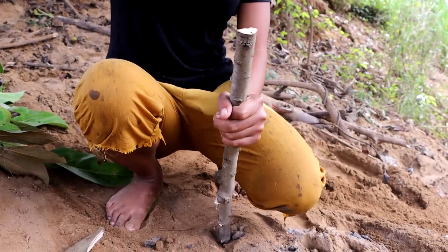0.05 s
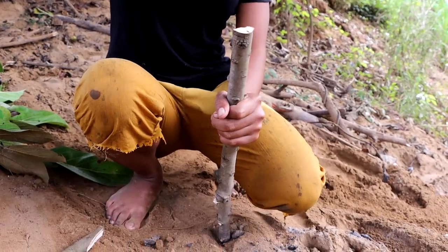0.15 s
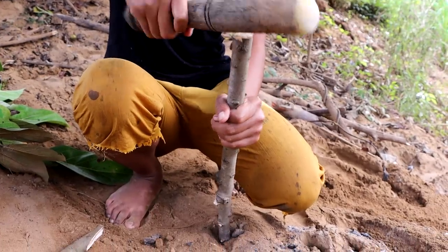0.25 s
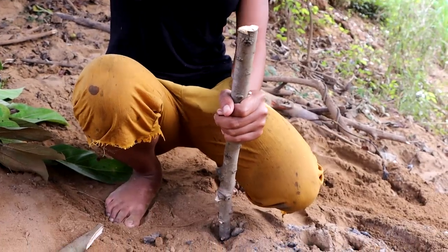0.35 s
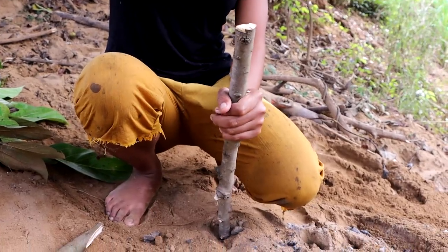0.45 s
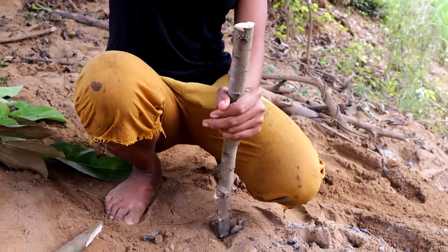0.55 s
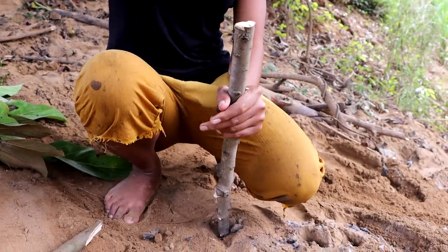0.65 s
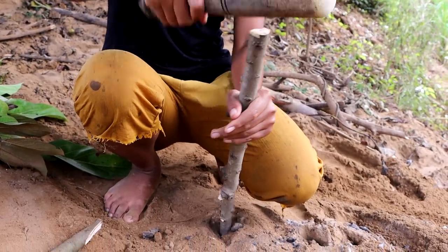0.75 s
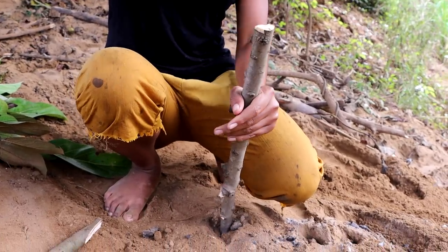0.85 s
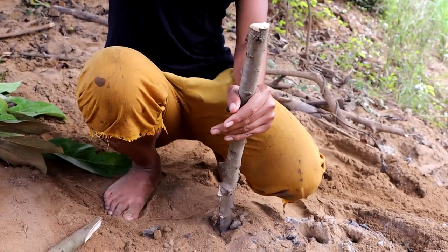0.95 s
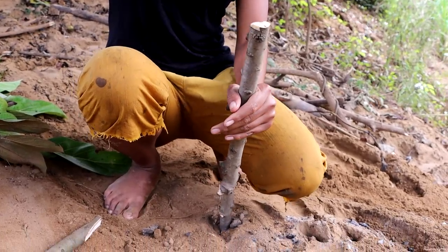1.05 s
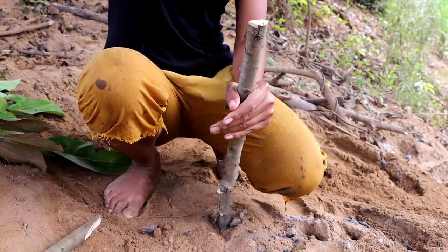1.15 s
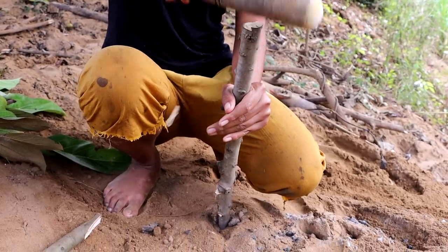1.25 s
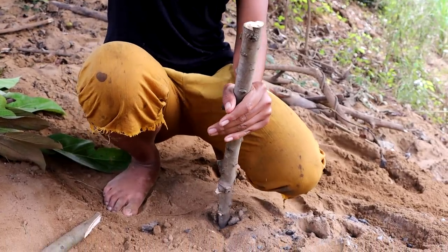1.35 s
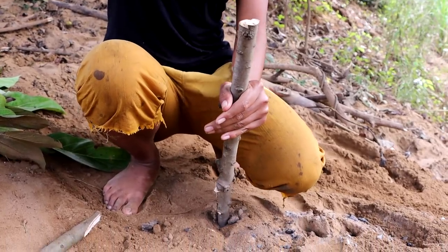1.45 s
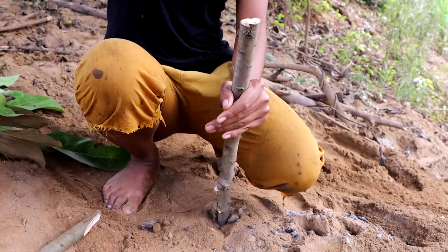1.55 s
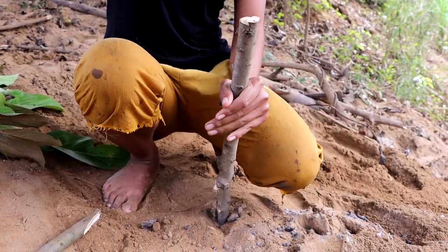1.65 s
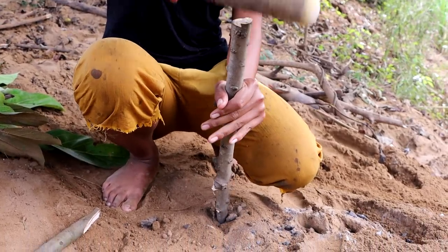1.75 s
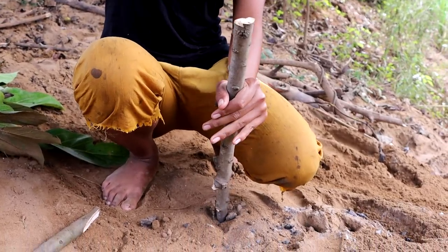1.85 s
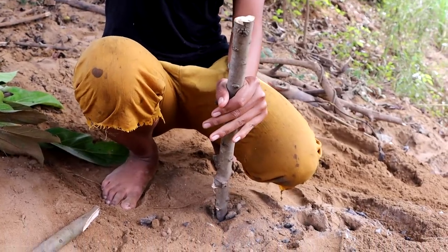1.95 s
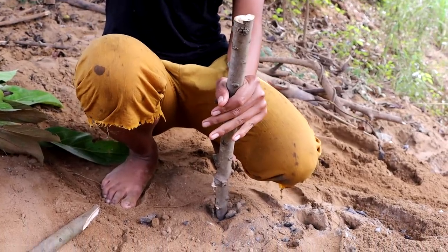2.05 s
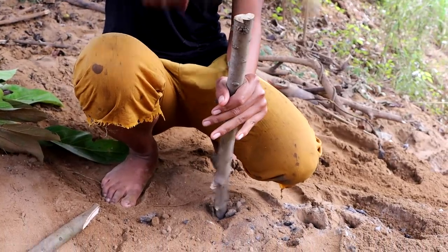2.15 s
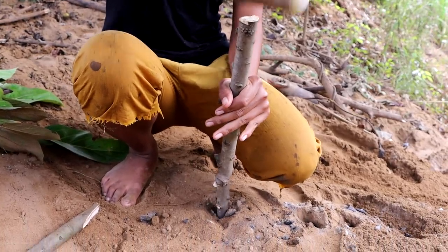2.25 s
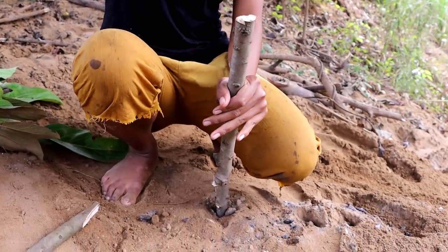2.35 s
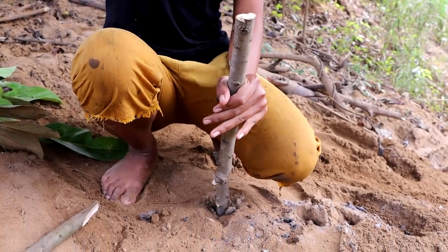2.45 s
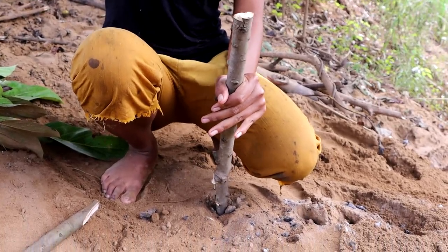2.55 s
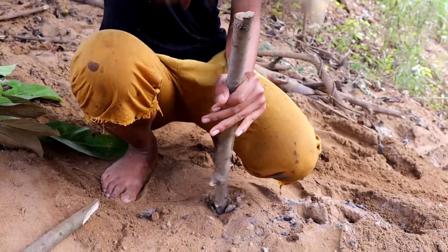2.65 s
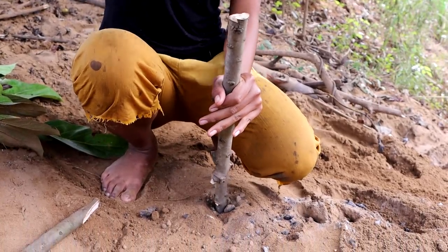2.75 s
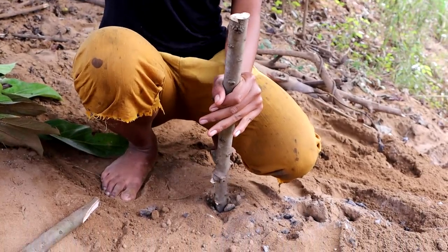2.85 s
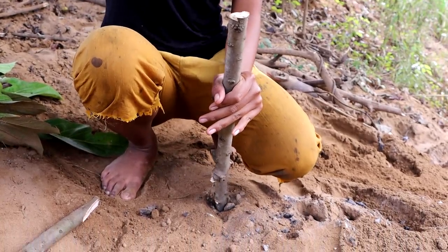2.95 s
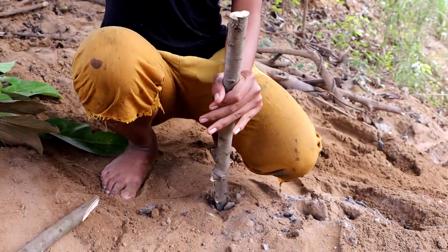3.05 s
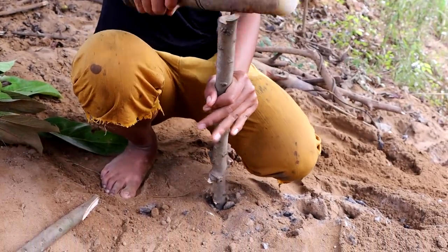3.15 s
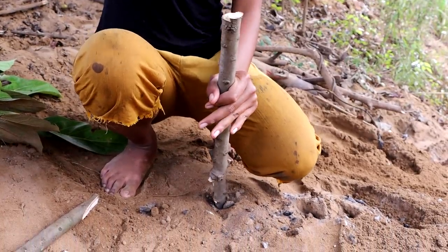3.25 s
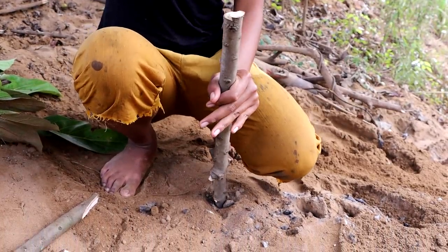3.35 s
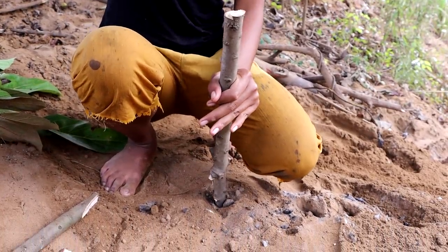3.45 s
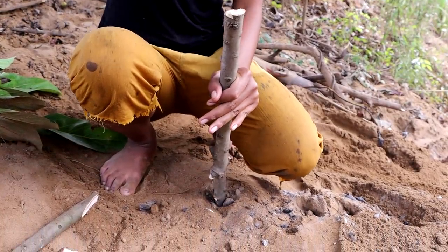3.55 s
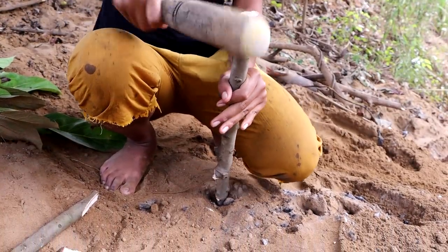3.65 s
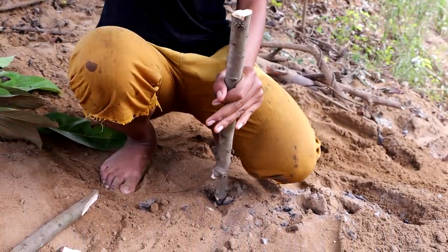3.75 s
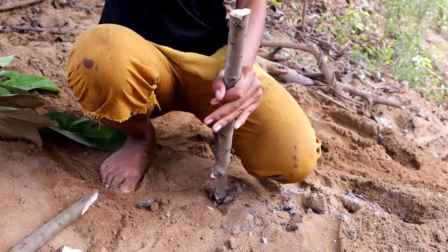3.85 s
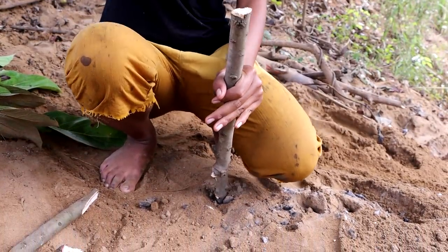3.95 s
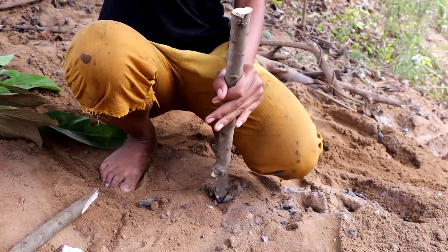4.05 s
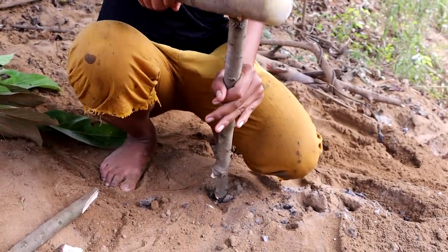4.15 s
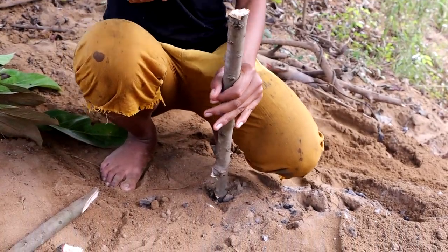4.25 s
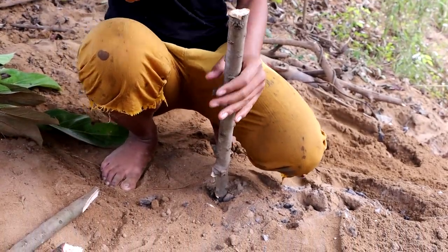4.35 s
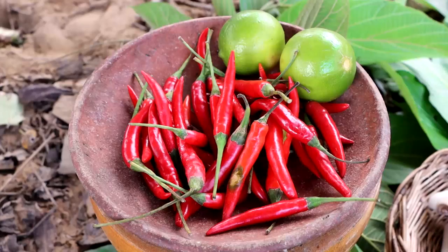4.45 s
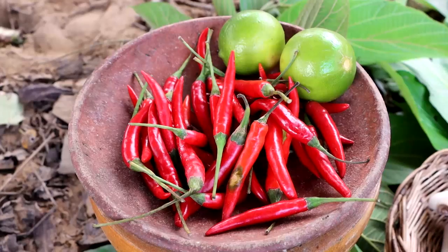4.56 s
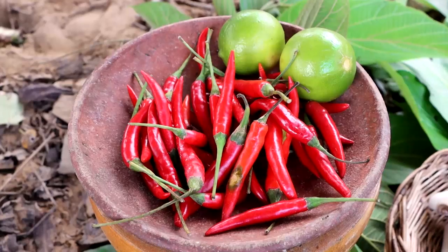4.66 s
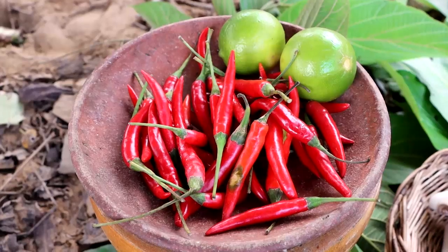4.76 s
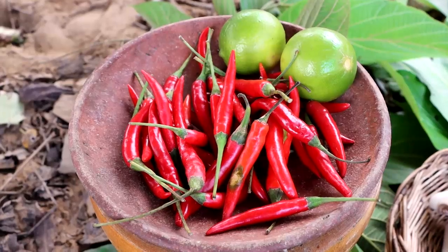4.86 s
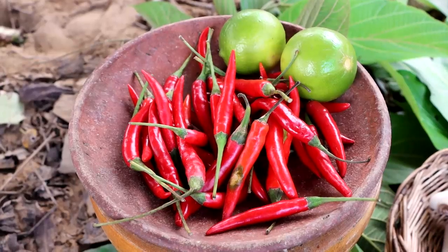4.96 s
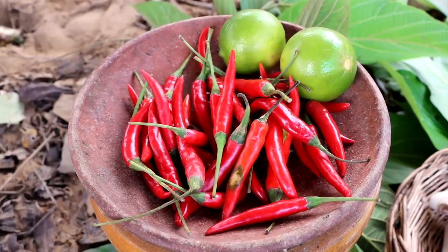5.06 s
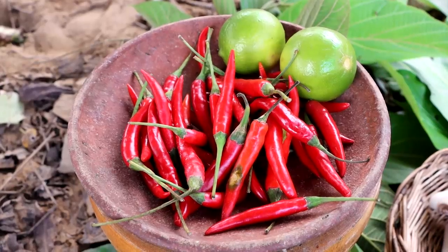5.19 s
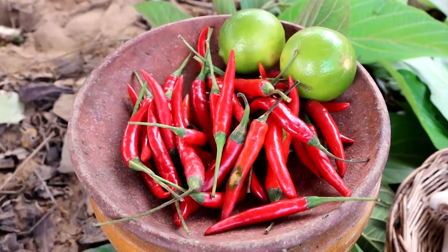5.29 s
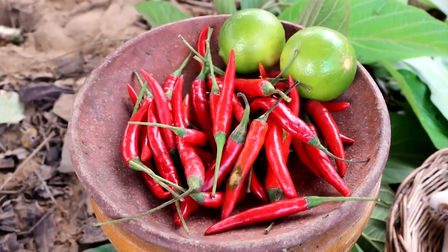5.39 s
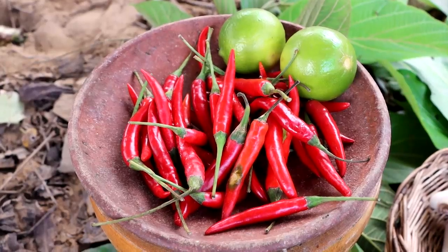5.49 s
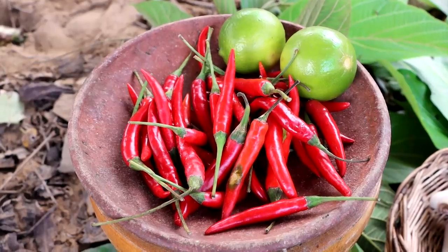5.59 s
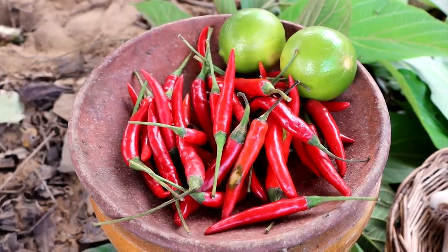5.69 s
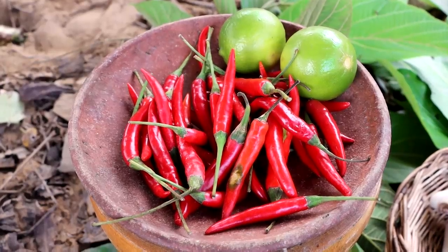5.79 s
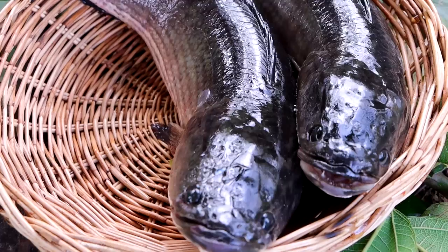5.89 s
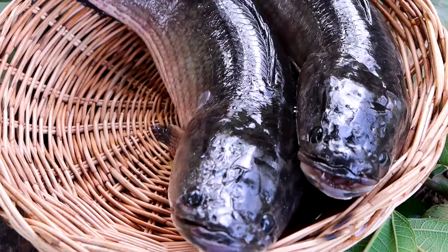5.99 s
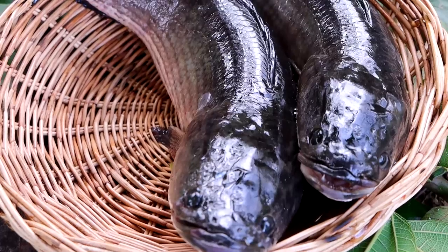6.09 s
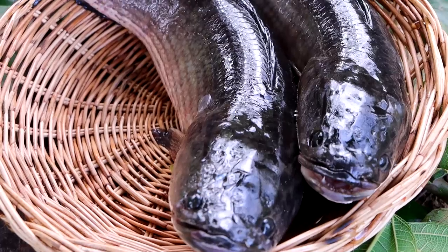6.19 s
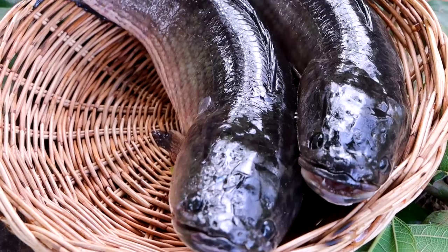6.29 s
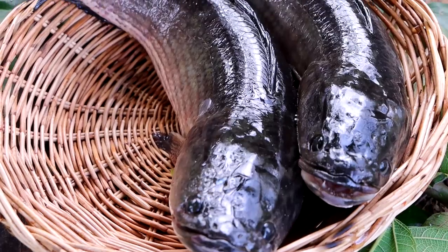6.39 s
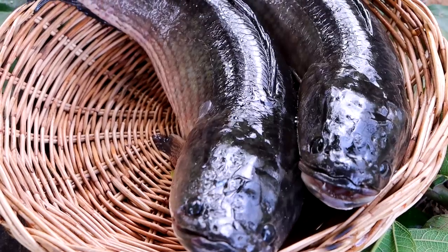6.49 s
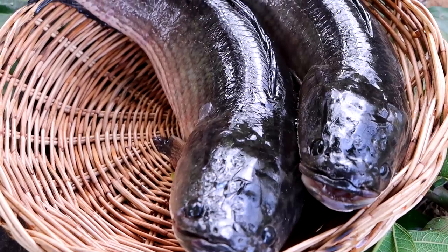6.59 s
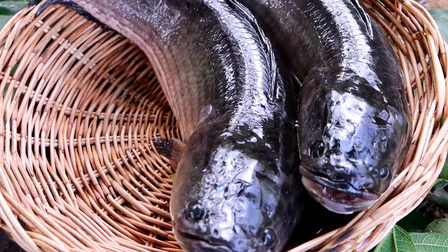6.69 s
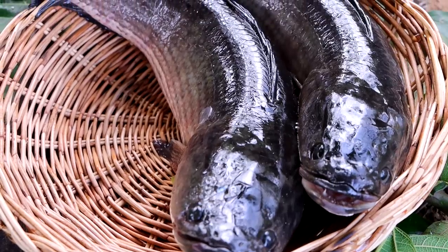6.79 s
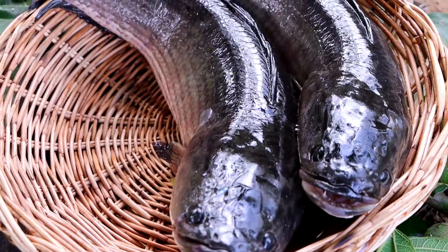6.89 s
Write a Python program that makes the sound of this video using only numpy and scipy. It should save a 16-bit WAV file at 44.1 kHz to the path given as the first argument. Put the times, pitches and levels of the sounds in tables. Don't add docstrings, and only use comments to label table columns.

```python
import sys
import numpy as np
from scipy import signal
from scipy.io import wavfile

SR = 44100
rng = np.random.default_rng(int(sys.argv[2]) if len(sys.argv) > 2 else 0)


def master(y):
    cut = np.clip(np.atleast_2d(y).T, -1, 1)
    pcm = np.round(cut * 32767)
    wavfile.write(sys.argv[1], SR, pcm.astype(np.int16))


def linear_from_db(decibels):
    return 10 ** (np.asarray(decibels, float) / 20)


N = 305613

# [start t/s, end t/s]
VIEWS = [
    (0, 4.442),
    (4.442, 5.823),
    (5.869, 7),
]
# [f/Hz, likeness from -1 to 1]
LIKENESS = [(60, 0.94), (130, 0.64), (290, 1), (640, 0.45), (1410, 0.01), (3100, -0.06), (6820, -0.52),
            (15000, 1)]

# [f/Hz, level per Hz/dB]
AIR = [
    [(15, -33), (25, -6), (107, -3), (322, -4), (421, -7), (895, -3.5), (1710, -2.5), (5140, -14),
     (6550, -3), (8130, -22), (12500, -19.5), (15500, -49)],
    [(15, -37), (25, -8.5), (84, -9.5), (253, -13), (804, -15), (919, -14), (1140, -11), (5430, -21.5),
     (6380, -14), (6920, -27), (12800, -31), (15500, -44.5)],
    [(15, -36), (25, 1), (126, -1.5), (582, -5.5), (666, -5), (1140, -1), (2170, -1), (5730, -14),
     (6380, -3), (6920, -12), (11800, -19), (15500, -46.5)],
]
AIR_LEVELS = [-65, -60, -59.5]
# [low f/Hz, high f/Hz, level/dB]
CICADAS = [(6280, 6850, -72), (6200, 6600, -71.5), (6220, 6600, -69)]
# [f/Hz, first t/s, last t/s, period/s, level/dB]
CRICKETS = [(7145, .06, 2.6, .226, -78), (7145, 2.82, 4.42, .2255, -77), (7310, 1.47, 4.3, .253, -80)]
# [start t/s, length/s, first f/Hz, glide/(Hz/s), level/dB]
BIRD_NOTES = [(0.0, 0.13, 4150, -6, -78.5), (.09, 0.041, 4720, 607, -69), (0.131, 0.068, 4290, -7000, -66),
              (.19, 0.078, 3650, 10, -80), (.31, .13, 3930, -0.5, -75.5), (0.444, 0.1, 3970, 1205, -70),
              (.48, 0.053, 4400, -3000, -68), (0.628, 0.085, 4310, -2000, -67.5),
              (0.861, 0.13, 4290, -1200, -72), (1.04, 0.079, 3990, -800, -72),
              (1.122, 0.052, 3750, 1200, -70), (1.295, 0.14, 4100, -1300, -75.5),
              (4.209, 0.086, 5250, -13000, -68), (4.277, .05, 4400, 0.5, -77),
              (4.365, .08, 4700, -2000, -67.5), (5.083, .05, 4500, -5000, -79.5),
              (5.37, 0.091, 4400, -400, -70.5), (5.663, 0.067, 4100, -0.5, -72)]
# [f/Hz, level/dB, time to fall 60 dB/s]
TRUNK_ECHOES = [(100, -43.5, .12), (295, -37.5, 0.1), (930, -46, 0.13), (2980, -36.5, 0.039),
                (6998, -37, 0.046), (13000, -44, 0.1)]
# [peak t/s, level/dB]
GUSTS = [(4.913, -51.5), (5.055, -61), (5.17, -69), (5.298, -63), (5.545, -58.5), (5.6, -65),
         (5.685, -51.5), (5.815, -54)]

# [start t/s, hold/s, level/dB, thin top above that/dB]
LEAF_STIRS = [(4.538, 0.0067, -57, -25), (4.617, 0.0095, -56, -11), (4.645, 0.12, -55, -8),
              (4.81, 0.056, -58, -9), (4.905, 0.0056, -59.5, -4), (5.17, 0.043, -74, -2),
              (5.38, 0.021, -84, 11), (5.584, .05, -94, 2)]
# [f/Hz, level per Hz/dB]
LEAF_COLOUR = [(240, -32), (400, 4), (442, -16), (660, 2.5), (768, -25), (1440, -3.5), (4670, 1.5),
               (8000, -13.5), (10400, -49), (17600, -120)]
# [t/s, peak level/dB, f/Hz, time to fall 60 dB/s]
SMALL_KNOCKS = [(3.759, -42.5, 7960, 0.055), (4.535, -34.5, 2570, 0.04), (4.569, -43, 4740, 0.045),
                (4.612, -57, 5150, 0.026), (4.635, -31, 560, 0.046), (4.735, -36, 4670, 0.076),
                (4.808, -31.5, 470, 0.12), (4.8942, -21.5, 970, 0.032), (4.897, -33, 694, 0.14),
                (6.41, -45, 406, 0.046)]

# [t/s, club level/dB, upper club level/dB, bright ring level/dB, crack level/dB]
BLOWS = [(0.2836, -6.5, -22, -29, -24), (0.7535, -4.5, -3, -26, -15), (1.2308, -5.5, -17.5, -19, -22.5),
         (1.7156, -3, -15, -19.5, -21), (2.2097, -4, -15, -15.5, -17.5), (2.7081, -2, -11.5, -22, -20),
         (3.1747, -6, -10, -16.5, -22), (3.6548, -13, -25, -33, -25.5), (4.1505, -6, -25.5, -22, -19)]
# [t/s, club, upper club, bright ring, crack level/dB]
LAST_BLOWS = [(6.232, -14, -18, -31.5, -27), (6.746, -11, -22, -23, -28.5)]
# [f/Hz, level/dB, time to fall 60 dB/s]
WOOD = [
    [(1112.5, 3.5, 0.034), (1375, -15, 0.014)],
    [(1230, 10, 0.026), (1778, -5, 0.024)],
    [(333.6, -4, 0.05), (497, 7.5, 0.022), (766, 15, .012)],
    [(2660, 13, 0.013), (2780, 1, 0.009), (2925, 9, 0.015)],
    [(1655, 4.5, .022), (2240, 0.5, 0.025), (3272, 3.5, .01), (3690, 0, 0.0083), (4940, -3, 0.012)],
]
# [f/Hz, level/dB, time to fall 60 dB/s]
LAST_WOOD = [
    [(845, 10.5, 0.013), (974, -5.5, 0.042)],
    [(1292, 4.3, 0.036), (1527, 5.5, 0.013)],
    [(289, 3, 0.021), (424, 10, 0.014), (595, 13.8, 0.011)],
    [(2730, 14.4, 0.012), (3050, 5, 0.03)],
    [(1725, 8.5, 0.017), (3170, -4.5, 0.013), (4010, -3.5, 0.015)],
]
GROUP_SIGNS = (1, 1, -1, 1, 1)
# [f/Hz, level/dB, time to fall 60 dB/s, rise/s]
SOIL = [(195.5, 15.5, 0.04, 0.0026), (153, 13.5, 0.045, 0.002), (118, 4, 0.069, .008), (88, 4, 0.078, .012)]
# [f/Hz, level per Hz/dB]
GRIT = [(150, -13.5), (500, -6.5), (1250, 3.5), (2000, -2), (2800, -3), (4500, -14), (8000, -20),
        (13000, -29.5)]
# [low f/Hz, high f/Hz, level/dB, time to fall 60 dB/s]
GLOW = [
    (110, 350, -16, 0.25),
    (1170, 1750, -27, 0.19),
    (2670, 2920, -22.5, 0.25),
]
# [low f/Hz, high f/Hz, level/dB, time to fall 60 dB/s]
LAST_GLOW = [
    (110, 230, 0, 0.13),
    (1106, 1440, -9.5, 0.14),
    (2900, 3300, -28, 0.17),
]
OVERLOAD = [.635, .9]


def unit(x):
    return x / np.sqrt(np.mean(x ** 2) + 1e-20)


def at_hz(points, hz, column=1):
    points = np.array(points)
    return np.interp(np.log(hz), np.log(points[:, 0]), points[:, column])


def band(x, low_hz, high_hz, order=2):
    edges = [low_hz, min(high_hz, 20000)]
    return signal.sosfilt(signal.butter(order, edges, "band", fs=SR, output="sos"), x)


def no_bass(x, order):
    return signal.sosfilt(signal.butter(order, 55, "high", fs=SR, output="sos"), x)


def drift(rate, size):
    r = np.exp(-80 * np.pi * rate / SR)
    slow = signal.lfilter([1], [1, -2 * r, r * r], rng.standard_normal(size // 40 + 2002))[2000:]
    return np.interp(np.arange(size) / 40, np.arange(len(slow)), unit(slow))


def add(out, sound, s):
    i = max(round(s * SR), 0)
    out[:, i:i + sound.shape[-1]] += sound[..., :N - i]


def coloured(spectrum, size, patchy_db):
    out = 0
    edges = 35 * 2 ** np.arange(0, 9.1, .5)
    white = rng.standard_normal((2, 2, size + 4000))
    for k, (low, high) in enumerate(zip(edges, edges[1:])):
        hz = np.sqrt(low * high)
        mid, side = band(white[k % 2], low, high)[:, 4000:]
        alike = np.clip(at_hz(LIKENESS, hz), -1, 1)
        gain = linear_from_db(at_hz(spectrum, hz) + patchy_db * drift(20, size))
        out = out + gain * (np.sqrt(1 + alike) * mid + np.sqrt(1 - alike) * side * [[1], [-1]])
    return unit(out)


def air_and_cicadas():
    out = np.zeros((2, N))
    for (start, end), air, air_db, (low_hz, high_hz, db) in zip(VIEWS, AIR, AIR_LEVELS, CICADAS):
        size = round((end - start) * SR)
        hiss = unit(band(rng.standard_normal((2, size)), low_hz, high_hz, order=3))
        cicadas = linear_from_db(db + drift(8, size)) * hiss
        add(out, linear_from_db(air_db) * coloured(air, size, patchy_db=1.9) + cicadas, start)
    return out


def crickets():
    chirp_s, pair_s, ear_lag_rad, wing_hz = .04, .056, 1.4, 170
    out, t = np.zeros((2, N)), np.arange(round(chirp_s * SR)) / SR
    swell = np.sin(np.pi * t / t[-1])
    for hz, first, last, period, db in CRICKETS:
        for s in np.arange(first, last, period):
            for later in (0, pair_s):
                phase = rng.uniform(0, 2 * np.pi) + np.array([[0], [ear_lag_rad]])
                vary_db = rng.standard_normal((2, 1))
                buzz = 1 + .2 * np.sin(2 * np.pi * wing_hz * t + phase)
                chirp = swell * buzz * np.sin(2 * np.pi * hz * t + phase)
                add(out, linear_from_db(db + 8 + vary_db) * chirp, s + later - chirp_s / 2)
    return out


def bird():
    edge_s, echo_t60_s, warble_hz, warble_depth = .02, .14, 65, .8
    song = np.zeros((1, N))
    for s, length, hz, glide, db in BIRD_NOTES:
        t = np.arange(round(length * SR)) / SR
        edges = np.clip(np.minimum(t, length - t) / edge_s, 0, 1)
        add(song, linear_from_db(db + 3.5) * edges * np.sin(2 * np.pi * (hz + glide * t / 2) * t), s)
    t = np.arange(round(.12 * SR)) / SR
    echoes = rng.standard_normal((2, len(t))) * linear_from_db(-60 * t / echo_t60_s)
    echoes = echoes / np.linalg.norm(echoes[0])
    warble = 1 + warble_depth * np.sin(2 * np.pi * warble_hz * np.arange(N) / SR)
    return signal.fftconvolve(song * warble, echoes, axes=1)[:, :N]


def forest_echo(dry):
    far_db, far_t60_s = -24.5, 0.61
    t, tail = np.arange(round(.6 * SR)) / SR, 0
    edges = 60 * 2 ** np.arange(0, 8.1, 1)
    white = rng.standard_normal((3, len(t)))
    for low, high in zip(edges, edges[1:]):
        hz = np.sqrt(low * high)
        alike = np.clip(at_hz(LIKENESS, hz), 0, 1)
        noise = band(np.sqrt(alike) * white[0] + np.sqrt(1 - alike) * white[1:], low, high)
        near = linear_from_db(-60 * t / at_hz(TRUNK_ECHOES, hz, column=2))
        far = linear_from_db(far_db - 60 * t / far_t60_s)
        tail = tail + linear_from_db(at_hz(TRUNK_ECHOES, hz)) * (near + far) * noise
    tail = tail * np.clip((t - .004) / .008, 0, 1)
    return signal.fftconvolve(dry.mean(axis=0)[None], tail, axes=1)[:, :N]


def wind():
    rise_db_per_s, fall_db_per_s, calm_db = 700, 404, -78
    start, end = VIEWS[1]
    t = np.arange(N) / SR
    s, peak_db = np.transpose(GUSTS)[..., None]
    gusts_db = peak_db - np.maximum(rise_db_per_s * (s - t), fall_db_per_s * (t - s))
    floor_db = np.where((t > start) & (t < end), calm_db, -150)
    db = np.maximum(gusts_db.max(axis=0), floor_db)
    lumps = band(rng.standard_normal((2, N)), 49, 190)
    return linear_from_db(db + np.array([[5], [-8]])) * unit(lumps)


def rustle():
    attack_s, release_db_per_s, body_rest_db, top_rest_db = 0.014, 500, -74, -78
    crackle_per_s, crackle_db = 350, -5.5
    out, (view_start, view_end) = np.zeros((2, N)), VIEWS[1]
    size = round(view_end * SR) - round(view_start * SR)
    t = view_start + np.arange(size) / SR
    s, hold, db, top_db = np.transpose(LEAF_STIRS)[..., None]
    swell = np.clip((t - s) / attack_s + 1, 0, 1)
    stir = swell * linear_from_db(db - release_db_per_s * np.maximum(t - s - hold, 0))
    body = linear_from_db(body_rest_db) + stir.sum(axis=0)
    thin = linear_from_db(top_rest_db) + (stir * linear_from_db(top_db)).sum(axis=0)

    clumps = linear_from_db(2.8 * drift(33, size) + 2.4 * drift(250, size))
    top = unit(band(rng.standard_normal((2, size)), 6800, 13500))
    hiss = linear_from_db(2.5) * body * coloured(LEAF_COLOUR, size, patchy_db=1.5)

    snap_sizes = linear_from_db(4 * np.minimum(rng.exponential(1, size), 4))
    snaps = (rng.random(size) < crackle_per_s / SR) * snap_sizes
    burst = rng.standard_normal((2, 130)) * linear_from_db(-np.arange(130) / 2.8)
    crackle = signal.fftconvolve(snaps[None], burst, axes=1)[:, :size]
    crackle = unit(band(crackle, 2000, 9000))
    add(out, linear_from_db(crackle_db) * body * crackle, view_start)
    add(out, clumps * (hiss + thin * top), view_start)
    return out


def small_knocks():
    out, t = np.zeros((2, N)), np.arange(round(.15 * SR)) / SR
    for s, db, hz, t60 in SMALL_KNOCKS:
        noise = rng.standard_normal((3, len(t)))
        noise = (noise[0] + 0.033 * noise[1:]) * linear_from_db(-60 * t / max(t60, .005))
        body = unit(band(noise, .5 * hz, 2.1 * hz))
        body = body + 0.21 * unit(band(noise, hz, hz + 5000, order=1))
        core = np.sin(2 * np.pi * hz * t) * linear_from_db(-60 * t * hz / 9.3)
        add(out, linear_from_db(db) * (.5 * body / np.abs(body).max() + 0.72 * core), s)
    return out


def rings(modes, t):
    pitch_spread, ear_db, ear_rad = .012, 1.04, 0.044
    out, ear = 0, np.array([[1], [-1]])
    late = t - ear * .5 / SR
    for hz, db, t60 in modes:
        lean = rng.standard_normal(2) * hz / 1000
        hz = hz * (1 + pitch_spread * rng.standard_normal())
        level = linear_from_db(db - 60 * t / t60 + ear_db * lean[1] * ear)
        out = out + level * np.sin(2 * np.pi * hz * late + ear_rad * lean[0] * ear)
    return out


def struck_wood(groups, levels_db, t, build_s):
    parting_at_s, parting_s = .0062, .0011
    parted = 1 / (1 + np.exp(-(t - parting_at_s) / parting_s))
    wood = 0
    for way, db, modes in zip(GROUP_SIGNS, levels_db, groups):
        wood = wood + way * linear_from_db(db) * rings(modes, t)
    return wood * (1 - np.exp(-t / build_s)) * linear_from_db(-8 * parted)


def cracking_fibres(crack_db, t):
    noise = band(rng.standard_normal((3, len(t))), 1600, 7000)
    return linear_from_db(crack_db + 3 - 60 * t / 0.011) * (noise[0] + 2 * noise[1:])


def bark_splinters(db, t):
    return linear_from_db(db - 60 * t / .008) * band(rng.standard_normal((2, len(t))), 9100, 19000)


def soil_thud(thud_db, t):
    depth = 1 + .07 * rng.standard_normal()
    thud = 0
    for hz, db, t60, rise in SOIL:
        level = linear_from_db(thud_db + db - 60 * t / t60) * (1 - np.exp(-t / rise)) ** 2
        thud = thud + level * np.sin(2 * np.pi * hz * depth * t + 1.8)
    return thud


def afterglow(glows, levels_db, t):
    noise, glow = rng.standard_normal((3, len(t))), 0
    for db, (low_hz, high_hz, level_db, t60) in zip(levels_db, glows):
        hum = unit(band(noise[0] + 0.64 * noise[1:], low_hz, high_hz))
        glow = glow + linear_from_db(db + level_db - 60 * t / t60) * hum
    return (1 - np.exp(-t / 0.023)) * glow


def blows(table, groups, glows, delay_s, build_s, sign, stake_db, tick_db):
    thud_usual_db, topsoil_db, topsoil_until_s = -28, -6, 1
    stake_follows = 0.37
    out, t = np.zeros((2, N)), np.arange(round(.2 * SR)) / SR
    settling = coloured(GRIT, len(t) * len(table), patchy_db=3.5).reshape(2, len(table), -1)
    for k, (s, low_db, high_db, ring_db, crack_db) in enumerate(table):
        thud_db = thud_usual_db + topsoil_db * (s < topsoil_until_s)
        wood_levels_db = (low_db, high_db, stake_db + stake_follows * low_db, ring_db, crack_db)
        wood = sign * struck_wood(groups, wood_levels_db, t, build_s)
        crack = cracking_fibres(crack_db, t)
        tick = bark_splinters(tick_db + .05 * low_db, t)
        thud = soil_thud(thud_db, t)
        grit = linear_from_db(crack_db - 17.5 - 60 * t / 0.21) * (1 - np.exp(-t / 0.0024)) * settling[:, k]
        glow = afterglow(glows, (thud_db, high_db, ring_db), t)
        add(out, wood + crack + tick + glow + thud + grit, s + delay_s)
    return out


def scene():
    hits = small_knocks()
    hits += blows(BLOWS, WOOD, GLOW, delay_s=-0.000035, build_s=0.00061, sign=1,
                  stake_db=-16.5, tick_db=-24.5)
    hits += blows(LAST_BLOWS, LAST_WOOD, LAST_GLOW, delay_s=0.00011, build_s=0.0011, sign=-1.14,
                  stake_db=-15, tick_db=-40)
    hits = no_bass(hits, order=3)
    return air_and_cicadas() + crickets() + bird() + forest_echo(hits) + wind() + rustle() + hits


def roll_off(x):
    return signal.sosfilt(signal.butter(12, 16800, fs=SR, output="sos"), x)


def record(dry):
    t = np.arange(N) / SR
    last_start = VIEWS[2][0]
    limit = np.where(t < last_start, *OVERLOAD)
    heard = (t < VIEWS[1][1]) | (t > last_start)
    flattened = np.clip(no_bass(dry, order=2), -limit, limit)
    rounded = signal.sosfilt(signal.butter(3, 13500, fs=SR, output="sos"), flattened)
    rounded = signal.sosfilt(signal.cheby2(10, 60, 17200, fs=SR, output="sos"), rounded)
    return roll_off(rounded * heard)


dry = scene()
out = record(dry)
master(out)
```